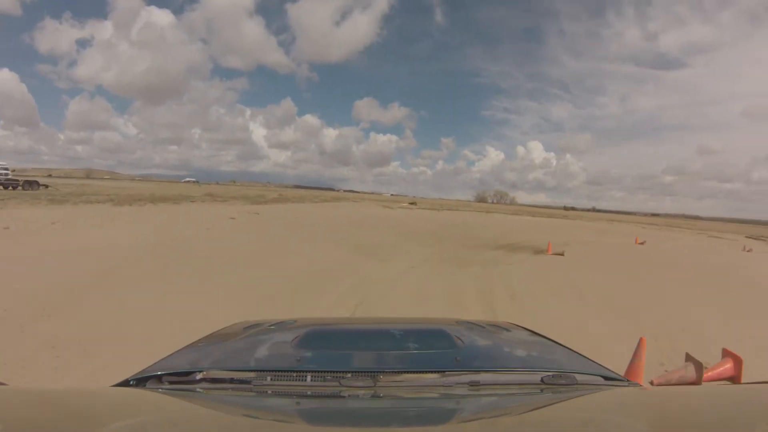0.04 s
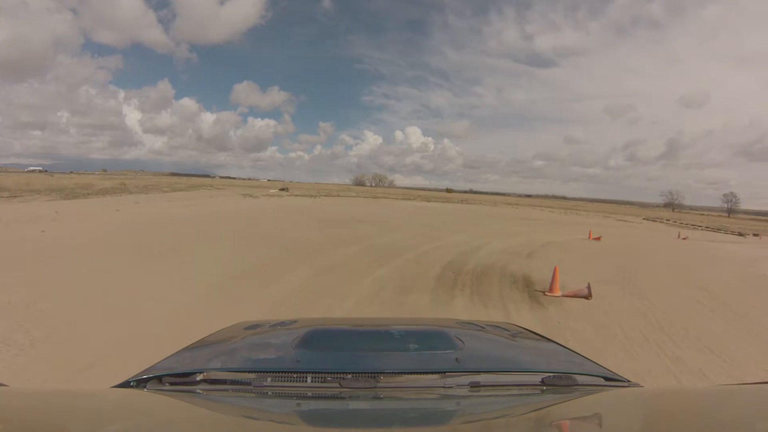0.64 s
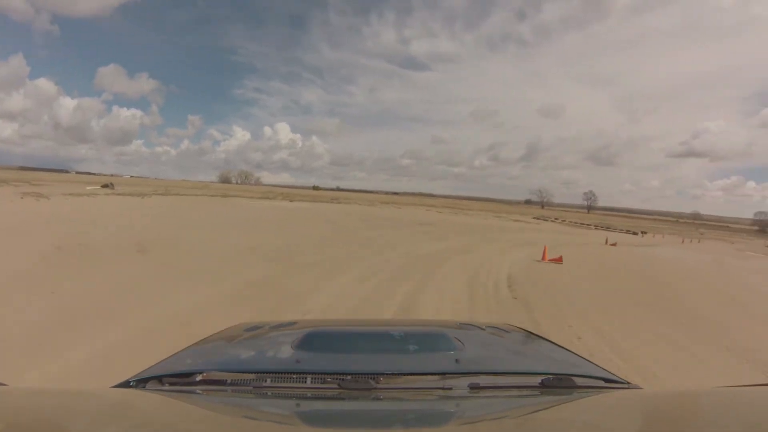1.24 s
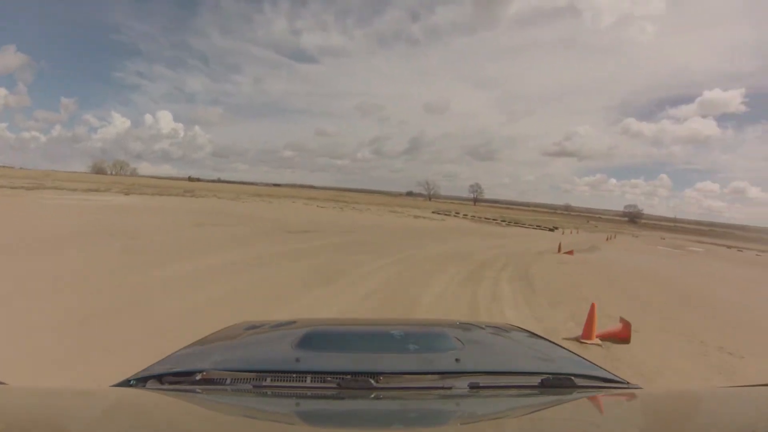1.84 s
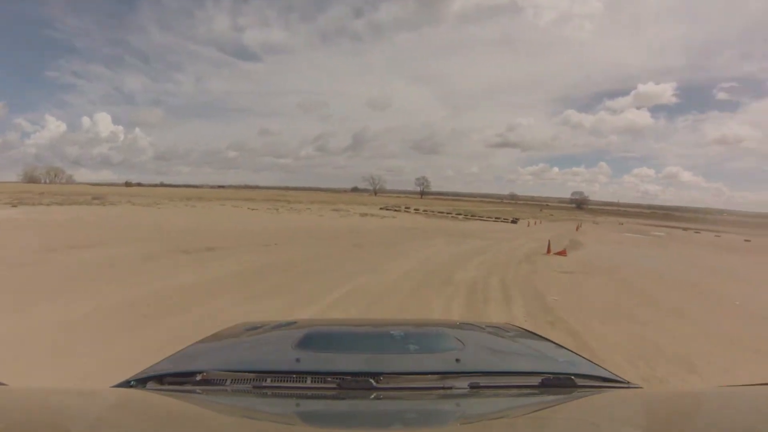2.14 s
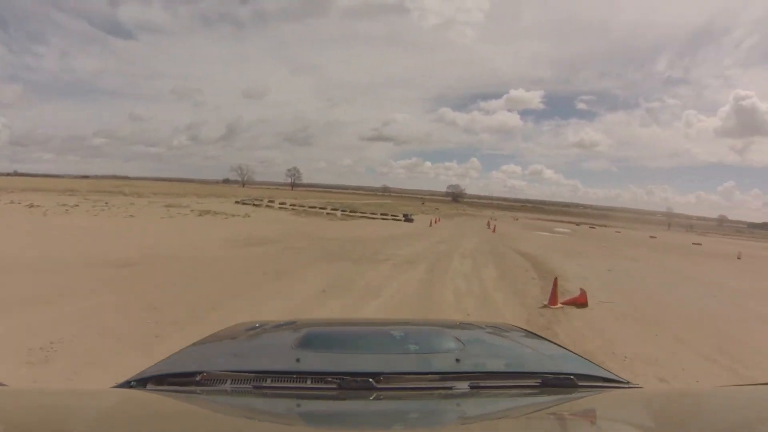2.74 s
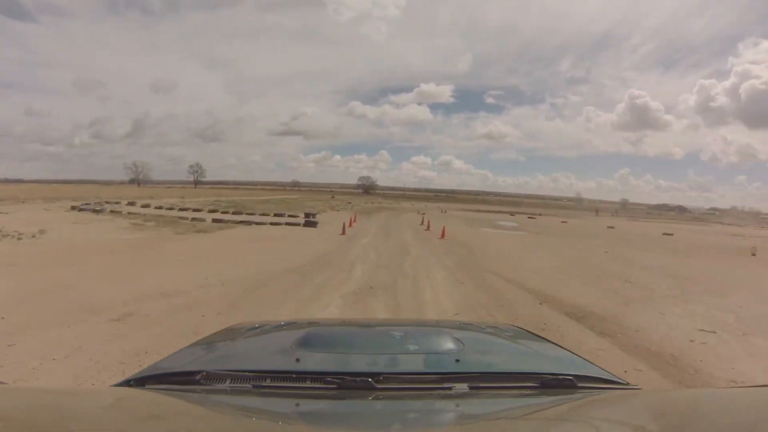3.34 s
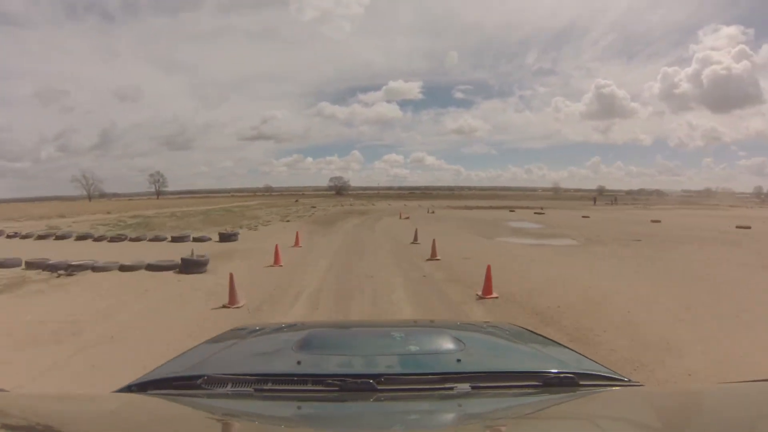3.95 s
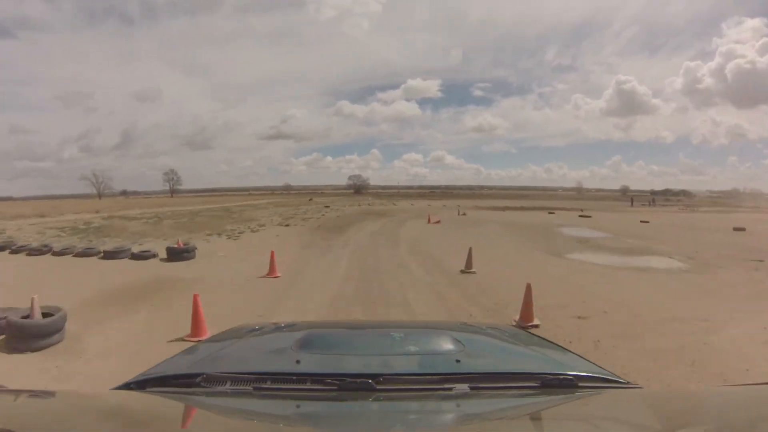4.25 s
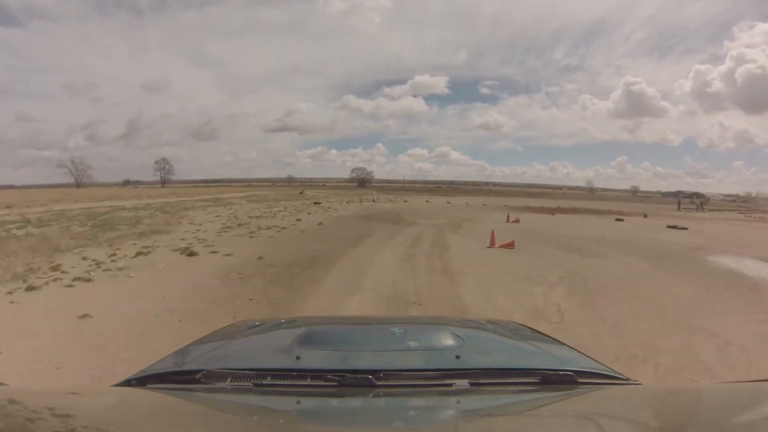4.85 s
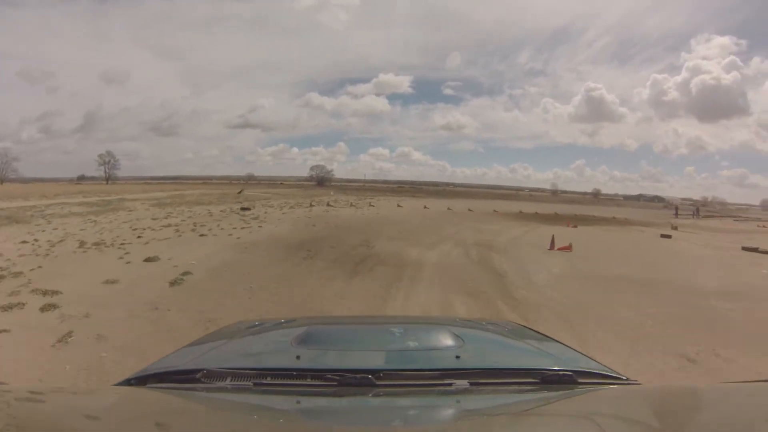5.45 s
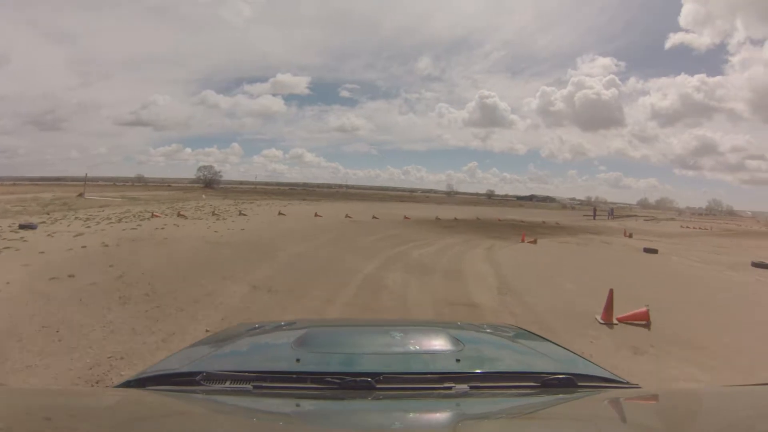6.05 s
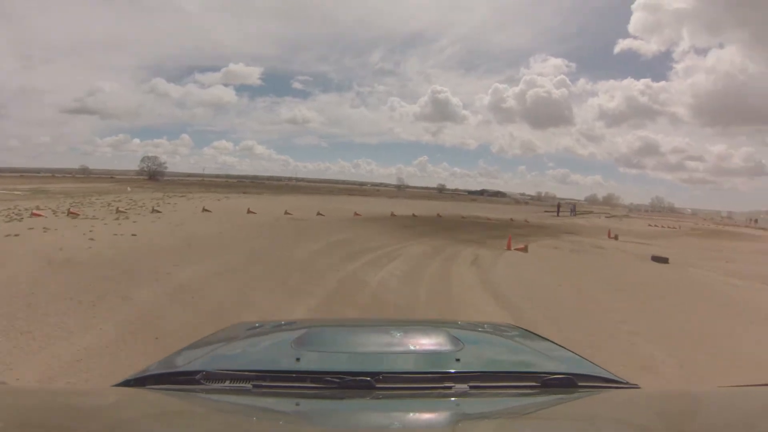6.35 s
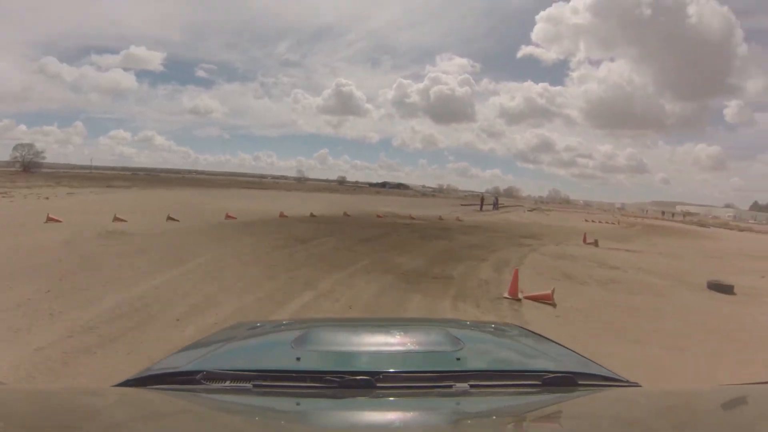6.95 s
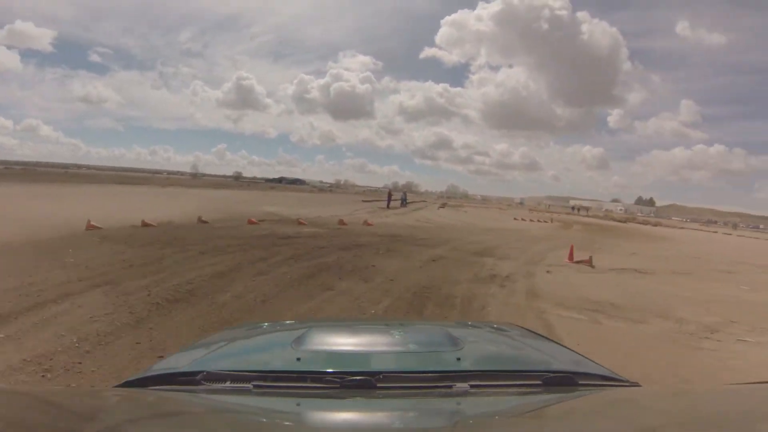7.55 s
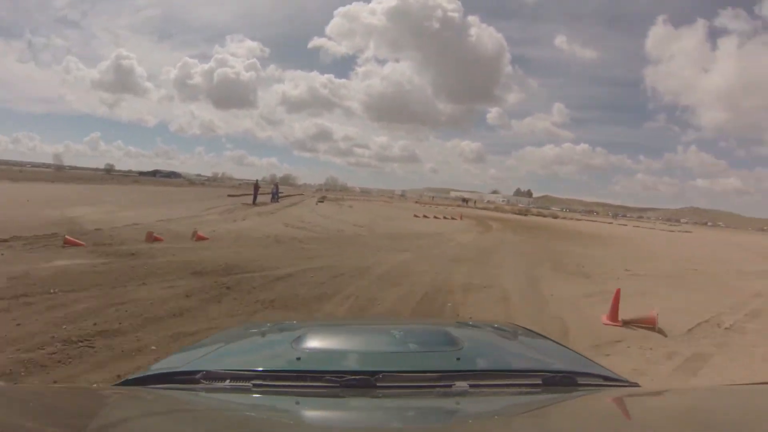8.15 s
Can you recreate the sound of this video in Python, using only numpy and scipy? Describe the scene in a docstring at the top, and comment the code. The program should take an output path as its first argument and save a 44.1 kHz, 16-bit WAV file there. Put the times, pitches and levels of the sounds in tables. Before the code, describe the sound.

A rally car drives over loose dirt, its engine a booming, uneven drone above a low rumble and a faint tyre hiss. Flung stones crack against the panels and grit ticks throughout. Midway, rough ground brings a run of rattling knocks, then more stones strike and dirt swishes up in short showers. The microphone sits in a closed housing fixed to the car's body.

```python
"""A dirt course, heard from a closed camera housing fixed to the body of a sliding rally car.
Engine and road shake the body into a booming drone over a low rumble; tyres hiss on loose soil.
Flung stones crack on the panels, grit ticks on the housing, and the mount knocks over rough ground.
Every blow rings one shared set of panel and housing modes."""
import sys
import numpy as np
from scipy import signal
from scipy.fft import rfft, irfft, next_fast_len
from scipy.io import wavfile
from scipy.ndimage import uniform_filter1d

SR = 44100
rng = np.random.default_rng(int(sys.argv[2]) if len(sys.argv) > 2 else 0)


def persist_wave(psi):
    """Save psi, clipped to +-1, as 16-bit WAV."""
    counts = np.round(np.clip(psi, -1, 1) * 32767).astype(np.int16)
    wavfile.write(sys.argv[1], SR, np.atleast_2d(counts).T)


N = 361179
TIME_S = np.arange(N) / SR
FFT_SIZE = next_fast_len(N, True)
BIN_HZ = np.maximum(np.fft.rfftfreq(FFT_SIZE, 1 / SR), 1)
CUTOFF_HZ = 15000

# Level curves. Each row: time in seconds, relative level in dB.
RUSH_DB = [(0.0, -66), (1.53, -66.5), (3.4, -66.5), (4.56, -61), (4.93, -63.5), (5.34, -71), (5.88, -76.5),
           (6.61, -75), (6.75, -80.5), (8.19, -81)]  # tyres and air
BUFFET_DB = [(0.0, -41), (0.04, -33.5), (0.75, -27.5), (0.77, -23.5), (1.12, -33.5), (4.08, -26.5),
             (4.22, -34), (5.11, -26), (5.63, -33.5), (6.82, -27), (6.91, -48), (7.0, -28.5), (7.64, -32),
             (8.03, -26), (8.14, -33.5), (8.19, -26)]  # air and sway on the housing
ROUGHNESS_DB = [(0.0, -45), (0.34, -43), (0.41, -39), (0.73, -44), (2.51, -45), (2.78, -38), (3.19, -42.5),
                (3.56, -37.5), (3.7, -45), (3.72, -32.5), (4.04, -44.5), (4.1, -32), (4.2, -44),
                (5.29, -37.5), (5.72, -48), (5.84, -42), (7.07, -47.5), (8.19, -41.5)]  # ground roughness, as road rumble
BOOM_DB = [(0.0, -35), (0.2, -25), (0.36, -31.5), (0.43, -22.5), (0.66, -28), (1.82, -28), (1.87, -34),
           (2.92, -22), (3.17, -31.5), (3.58, -23), (3.63, -33), (3.9, -19), (4.04, -25.5), (4.13, -16),
           (4.17, -36.5), (4.7, -23), (4.74, -39), (4.86, -15.5), (5.38, -30), (5.47, -15), (5.75, -31.5),
           (5.79, -24), (5.98, -23.5), (6.11, -38), (6.25, -28.5), (6.77, -33.5), (6.89, -19), (7.02, -34),
           (7.48, -31.5), (7.89, -24), (8.14, -39.5), (8.19, -25)]  # body boom under engine load

# Noise spectra. Each row: frequency in Hz, relative density in dB.
DUST_SPECTRUM = [(4000, -32.5), (7200, -12.5), (9500, -13), (11000, -4.5), (11800, -3.5), (12700, -15),
                 (15000, -29)]
RUSH_SPECTRUM = [(300, -15), (520, -13.5), (720, -3), (1000, -15), (1420, -1), (1900, -5), (2700, -5),
                 (3400, -14), (4300, -15), (5400, -14), (5800, -19), (8300, -23.5), (9800, -34),
                 (14500, -40)]
BUFFET_SPECTRUM = [(8, -25), (15, -14), (25, 0.5), (38, -1), (48, -1), (70, -9.5), (88, -3.5), (130, -12.5),
                   (200, -41.5)]
ROAD_SPECTRUM = [(70, -22.5), (120, 9.5), (145, 5), (165, -3), (185, 1.5), (203, -6.5), (240, -4),
                 (280, -10.5), (345, -9.5), (410, -24), (480, -32), (900, -31)]
# Force spectra of fine spray and soft dirt. Each row: frequency in Hz, relative force in dB.
SPRAY_FORCE = [(500, 5), (1500, -1.5), (2300, 1), (4700, -27)]
DIRT_FORCE = [(500, -8.5), (950, -9.5), (1250, 10.5), (1550, 3.5), (2300, -2.5), (4300, -27.5)]
# Housing resonances in the rush. Each row: centre in Hz, width in Hz, boost in dB.
HOUSING_PEAKS = [(2307, 230, 11.5), (4950, 330, 6), (8200, 300, 1)]
# Panel and housing modes. Each row: frequency in Hz, gain in dB, T60 in seconds.
MODES = [(307, -30, 0.066), (595, -19.5, 0.0041), (737, -14, 0.0086), (1067, -5, 0.01), (1200, 1, 0.0076),
         (1469, 4, 0.0093), (1637, -1.5, 0.0097), (1908, -7.5, 0.02), (2280, -5, 0.025),
         (2464, -6.5, 0.018), (2880, -21.5, 0.056), (3087, -13.5, 0.026), (3370, -4, 0.0032),
         (3646, -13.5, 0.028), (4050, -12.5, 0.0076), (4475, -12, 0.017), (4950, -17, 0.0058),
         (6230, -13, 0.0067), (7330, -3.5, 0.0043), (8080, -9, 0.0023), (8560, -12, 0.0058),
         (11380, -2.5, 0.0029), (11700, -11, 0.002), (15000, -12.5, .006)]

# Dirt thrown up by the wheels. Each row: peak time in seconds, half length in seconds, relative dB.
DIRT_SHOWERS = [(0.556, 0.023, -50), (0.772, 0.022, -55), (1.301, 0.029, -52), (1.558, .015, -59),
                (2.277, 0.035, -58), (4.73, 0.062, -50.5), (5.326, 0.016, -50.5), (6.16, 0.017, -61),
                (6.82, 0.02, -53.5), (6.911, 0.02, -53), (7.084, 0.016, -63), (7.546, 0.015, -52),
                (7.597, .015, -51), (7.827, 0.024, -57.5), (7.944, 0.019, -53), (8.159, .02, -57)]
# Grit on the housing. Each row: start in seconds, relative force in dB.
GRIT_HITS = [(1.257, -45.5), (1.298, -51), (2.0973, -54), (2.944, -47), (3.0588, -48), (3.3285, -51),
             (3.7367, -44), (3.9756, -38.5), (4.1289, -50), (4.647, -39.5), (5.148, -51), (6.1544, -54),
             (6.7049, -54), (8.1726, -43)]
# Hard knocks of the mount. Each row: start in seconds, panel and housing forces in relative dB.
MOUNT_KNOCKS = [(2.799, -33, -43), (2.814, -31, -39.5), (2.877, -26.5, -39), (2.957, -31, -41),
                (2.973, -31.5, -44), (3.119, -29.5, -40), (3.393, -31, -44), (3.509, -27, -42),
                (3.536, -24, -35.5), (3.624, -26, -59), (3.725, -27, -30.5), (3.752, -26.5, -34),
                (3.776, -32, -37), (3.792, -28.5, -33.5), (3.836, -32, -37), (3.86, -30, -45),
                (3.875, -26.5, -28), (3.883, -21.5, -39), (3.957, -29, -35), (4.041, -13, -16),
                (4.111, -20, -22), (4.159, -34.5, -35.5), (4.509, -30.5, -36.5), (4.612, -26.5, -32),
                (4.621, -20.5, -39), (4.639, -27, -49), (4.657, -33, -36), (4.693, -24.5, -25),
                (4.701, -34, -51), (4.845, -28, -36), (4.887, -28, -28.5), (5.961, -25, -41.5)]
# Stones on the body. Each row: start in seconds, contact force in dB, low thud in dB,
# reach in Hz (higher for a shorter contact), sharp-edge crack in dB. Levels are relative.
STONE_HITS = [(0.0213, -27.5, -31, 1410, -75), (0.2671, -13.5, -16, 1470, -24),
              (0.793, -18, -20, 1300, -72), (0.996, -16.5, -15.5, 1410, -63), (2.4614, -19, -16, 1340, -78),
              (4.7977, -17, -23, 1950, -29), (5.0689, -13, -21, 4760, -29.5),
              (5.1123, -24.5, -27, 1450, -53), (6.1309, -21.5, -28, 1760, -61),
              (6.2155, -18.5, -15, 1480, -46.5), (6.4014, -33, -33, 1280, -80),
              (6.6095, -26.5, -17, 1800, -48), (6.799, -20.5, -23, 1970, -45),
              (7.3216, -13.5, -22, 1870, -25.5), (7.6135, -24.5, -20, 1380, -70),
              (7.88, -35.5, -33, 1800, -53.5), (8.0049, -23, -32, 1780, -49),
              (8.1188, -17.5, -27, 1850, -32)]


def from_db(db):
    """Decibels to gain."""
    return 10 ** (np.asarray(db) / 20)


def unit_rms(x):
    """Scale to rms 1."""
    return x / np.sqrt(np.mean(x ** 2) + 1e-20)


def curve(rows):
    """A level curve at every sample."""
    return np.interp(TIME_S, *np.transpose(rows))


def db_at(spectrum, hz):
    """Read a spectrum on a log-frequency axis."""
    points_hz, points_db = np.transpose(spectrum)
    return np.interp(np.log(hz), np.log(points_hz), points_db)


def low_pass(x, hz, order):
    """Butterworth low-pass."""
    return signal.sosfilt(signal.butter(order, hz, fs=SR, output="sos"), x)


def drift(corner_hz, size=8192):
    """Slow random wander, rms 1."""
    hz = np.fft.rfftfreq(size, TIME_S[-1] / size)
    slow = irfft(rfft(rng.standard_normal(size)) / (1 + (hz / corner_hz) ** 2))
    return np.interp(TIME_S, np.linspace(0, TIME_S[-1], size), unit_rms(slow))


def random_times(per_s):
    """Poisson arrivals in seconds."""
    times_s = np.cumsum(rng.exponential(1 / per_s, size=200))
    return times_s[times_s < TIME_S[-1]]


def noise(spectrum, peaks=()):
    """Shaped noise with resonances, rolled off above its last point; rms 1."""
    peaks_db = sum(db / (1 + (2 * (BIN_HZ - hz) / width_hz) ** 2) for hz, width_hz, db in peaks)
    gain = from_db(db_at(spectrum, BIN_HZ) + peaks_db) / (1 + (BIN_HZ / spectrum[-1][0] / 2) ** 4)
    return unit_rms(irfft(rfft(rng.standard_normal(FFT_SIZE)) * gain, FFT_SIZE)[:N])


def steady(x, window_s=0.1):
    """Even out the slow swells of a noise."""
    return x / np.sqrt(uniform_filter1d(x ** 2, int(window_s * SR)) + 1e-9)


def ring(force, hz, t60_s):
    """One mode: a unit click starts a decaying sine of height 1."""
    radius, angle = from_db(-60 / (t60_s * SR)), 2 * np.pi * hz / SR
    return signal.lfilter([0, np.sin(angle)], [1, -2 * radius * np.cos(angle), radius ** 2], force + 1e-18)


def patter(spectrum, per_s, size_db, clump_db):
    """Clumps of small soft grains ring the lower modes; rms 1."""
    lands = rng.random(N) < per_s * from_db(clump_db * drift(14)) / SR
    grains = lands * from_db(size_db * np.minimum(rng.exponential(1, N), 4))
    spot = rng.standard_normal(N)  # each grain favours other modes
    return unit_rms(sum(from_db(db + db_at(spectrum, hz)) * ring(grains * np.roll(spot, k), hz, t60_s)
                        for k, (hz, db, t60_s) in enumerate(MODES) if hz < spectrum[-1][0]))


def strike(times_s, spectra, scatter_db, skid_s, touches=3, step_db=-9.0):
    """Blows ring the modes, each with its own force spectrum; weaker touches follow as it skids off."""
    gaps_s = skid_s * rng.uniform(0.8, 1.6, (len(times_s), touches))
    delays_s = np.cumsum(gaps_s, axis=1) - gaps_s[:, :1]
    onsets = np.round((np.array(times_s)[:, None] + delays_s) * SR).astype(int).clip(0, N - 1)
    fading = from_db(step_db * np.arange(touches))
    blow_db = np.array([db_at(spectrum, np.array(MODES)[:, 0]) for spectrum in spectra])
    blow_db += scatter_db * rng.standard_normal(blow_db.shape)  # each spot favours other modes
    out = np.zeros(N)
    for k, (hz, db, t60_s) in enumerate(MODES):
        # touches share the blow's strength, however they line up with the mode's swing
        overlap = np.maximum(abs(np.exp(2j * np.pi * hz * delays_s) @ fading), 0.75)
        forces = (from_db(blow_db[:, k] + db) / overlap)[:, None] * fading
        out += ring(np.bincount(onsets.ravel(), forces.ravel(), N), hz, t60_s) * (-1) ** k
    return out


def shiver(hits, tail_db, t60_s, dull_hz):
    """Add the dull tail of the sheet metal's many weak modes."""
    age_s = TIME_S[:SR // 4]
    tail = rng.standard_normal(len(age_s)) * from_db(-60 * age_s / t60_s)
    tail = low_pass(tail / np.linalg.norm(tail), dull_hz, order=3)
    return hits + from_db(tail_db) * signal.fftconvolve(hits, tail)[:N]


def dust(level_db=-92.5, puff_db=6.0):
    """Puffs of fine dust sizzle on the housing."""
    return from_db(level_db + puff_db * np.minimum(drift(16), 2)) * noise(DUST_SPECTRUM)


def soil(spray_db=-61.5, db_per_rough_db=0.32, shower_gain_db=1.5):
    """Spray on the panels grows on rough ground; short dense showers swish."""
    rough_db = curve(ROUGHNESS_DB)
    spray_gain = from_db(spray_db + db_per_rough_db * (rough_db - rough_db.mean()))
    shower_gain = sum(from_db(db + shower_gain_db) * np.exp(-((TIME_S - peak_s) / half_s) ** 2 / 2)
                      for peak_s, half_s, db in DIRT_SHOWERS)
    spray = spray_gain * patter(SPRAY_FORCE, per_s=890, size_db=1.5, clump_db=2.0)
    showers = shower_gain * patter(DIRT_FORCE, per_s=1300, size_db=2.5, clump_db=1.5)
    return spray + showers


def rush(gain_db=12.0, flutter_db=1.02):
    """Tyres and air hiss through the housing resonances."""
    level_db = curve(RUSH_DB) + gain_db + flutter_db * drift(29)
    return from_db(level_db) * noise(RUSH_SPECTRUM, HOUSING_PEAKS)


def grit(per_s=5, above_rush_db=3.0, spread_db=3.0):
    """Tiny hard grains tick in the high modes; random finer ones hit harder as the rush grows."""
    rush_db = curve(RUSH_DB)
    sizes_db = above_rush_db + spread_db * rng.standard_normal(200).clip(-2, 2)
    fine = [(s, rush_db[int(s * SR)] + db) for s, db in zip(random_times(per_s), sizes_db)]
    rows = list(GRIT_HITS) + fine
    spectra = [[(1500, db - 1.5), (4000, db + 2.5), (7000, db + 0.5), (14000, db - 2)] for _, db in rows]
    return strike([row[0] for row in rows], spectra, scatter_db=3.5, skid_s=0.0017)


def jolts(rise_s=0.0036, decay_s=0.0099):
    """Envelope of the body's shudder after each hard knock, scaled by its strength."""
    starts_s, panel_db, _ = np.transpose(MOUNT_KNOCKS)
    age_s = TIME_S[:SR // 8]
    shudder = (1 - np.exp(-age_s / rise_s)) * np.exp(-age_s / decay_s)
    kicks = np.bincount((starts_s * SR).astype(int), from_db(panel_db), N)
    return signal.oaconvolve(kicks, shudder)[:N]


def rumble(buffet_gain_db=1.5, gust_db=1.0, road_gain_db=5.5, rut_db=2.0, jolt_gain_db=0.5):
    """Air and sway buffet the housing; ruts and jolts shake higher body resonances."""
    sway = from_db(curve(BUFFET_DB) + buffet_gain_db + gust_db * drift(16))
    buffet = sway * steady(noise(BUFFET_SPECTRUM))
    ruts = from_db(curve(ROUGHNESS_DB) + road_gain_db + rut_db * drift(25))
    shaking = np.hypot(ruts, from_db(jolt_gain_db) * jolts())
    return buffet + shaking * steady(noise(ROAD_SPECTRUM))


def chatter(per_s=7, rough_above_db=-40.0, panel_db=-41.5, housing_db=-44.0, spread_db=4.5):
    """Knock rows for light random rattles of the mount, on rough ground only."""
    rough_db = curve(ROUGHNESS_DB)
    sizes_db = spread_db * rng.standard_normal(200)
    return [(s, panel_db + db, housing_db + db) for s, db in zip(random_times(per_s), sizes_db)
            if rough_db[int(s * SR)] > rough_above_db]


def knocks(rows, blunt_hz=3600):
    """Blunt contacts of the mount: strong low modes, little treble."""
    spectra = [[(750, 2.0 + 0.69 * panel_db), (1450, panel_db - 3.0),  # thud, panel
                (2300, housing_db + 5.5), (3200, housing_db - 16.0)]  # ring, clack
               for _, panel_db, housing_db in rows]
    hits = strike([row[0] for row in rows], spectra, scatter_db=3.0, skid_s=0.0012)
    return shiver(low_pass(hits, blunt_hz, order=3), tail_db=-22.5, t60_s=0.067, dull_hz=3000)


def pebbles(per_s=7, contact_db=-45.5, thud_db=-45.0, reach_hz=1550, crack_db=-72, spread_db=3.5):
    """Stone rows for faint random ticks of small pebbles."""
    sizes_db = spread_db * rng.standard_normal(200).clip(-2, 2)
    return [(s, contact_db + db, thud_db + db, reach_hz, crack_db + db)
            for s, db in zip(random_times(per_s), sizes_db)]


def stones(rows, thud_hz=650, panel_hz=1150, fall_db_per_octave=15):
    """Stones hit the panels: force falls off above each one's reach; a sharp edge adds a flat crack."""
    hz = np.geomspace(panel_hz, CUTOFF_HZ, num=24)
    spectra = []
    for _, contact_db, thud_db, reach_hz, crack_db in rows:
        contact = from_db(contact_db - fall_db_per_octave * np.log2(np.maximum(hz / reach_hz, 1)))
        force_db = 20 * np.log10(np.hypot(contact, from_db(crack_db)))
        spectra.append([(thud_hz, thud_db), *zip(hz, force_db)])
    hits = strike([row[0] for row in rows], spectra, scatter_db=1.5, skid_s=0.0012)
    return shiver(hits, tail_db=-15.0, t60_s=0.14, dull_hz=3900)


def drone(boom_hz=107.3, waver_hz=4.06, throb_db=3.0, gain_db=0.8,
          upper_hz=135, upper_db=-17.0, upper_t60_s=0.04):
    """The body booms near one pitch, unevenly driven by engine and wheels; a broader mode sits above."""
    swell = uniform_filter1d(from_db(curve(BOOM_DB) + gain_db), SR // 80)  # a resonance cannot jump
    phase = 2 * np.pi * np.cumsum(boom_hz + waver_hz * drift(16)) / SR
    boom = np.sqrt(2) * np.sin(phase) * from_db(throb_db * np.minimum(drift(16), 1))
    shaking = ring(rng.standard_normal(N), upper_hz, upper_t60_s)
    upper = unit_rms(ring(shaking, upper_hz, upper_t60_s))
    return swell * (boom + from_db(upper_db) * upper)


def scene():
    """Everything reaches one microphone through the car body."""
    driving = drone() + rumble() + rush() + soil() + dust()
    blows = grit() + stones(list(STONE_HITS) + pebbles()) + knocks(list(MOUNT_KNOCKS) + chatter())
    return (driving + blows)[None]


def record(dry):
    """Steep low-pass on the top treble."""
    return signal.sosfilt(signal.ellip(10, 0.1, 90, CUTOFF_HZ, fs=SR, output="sos"), dry)


dry = scene()
out = record(dry)
persist_wave(out)
```